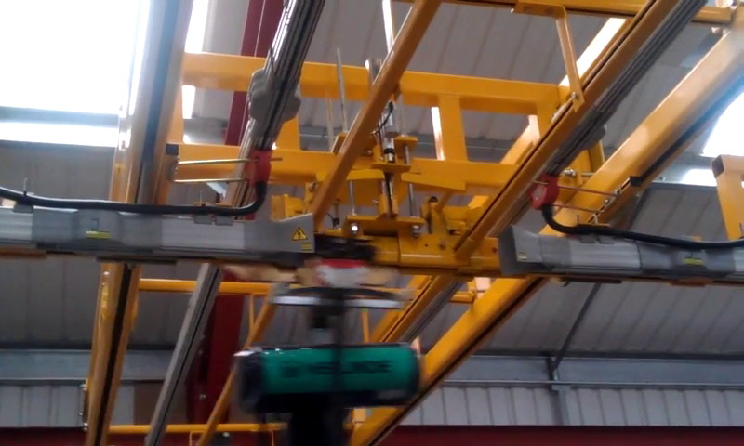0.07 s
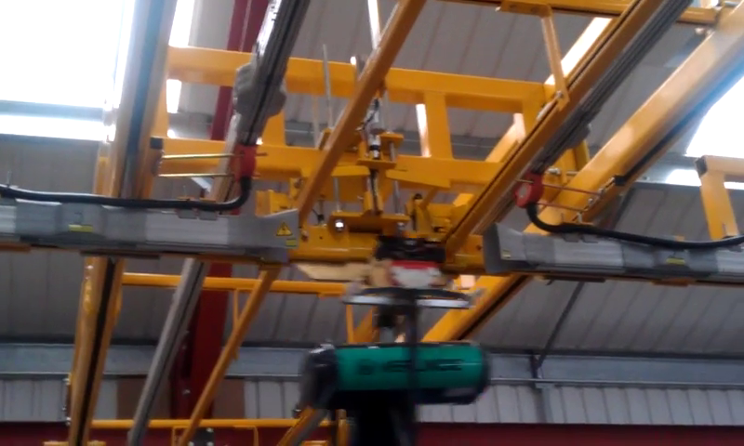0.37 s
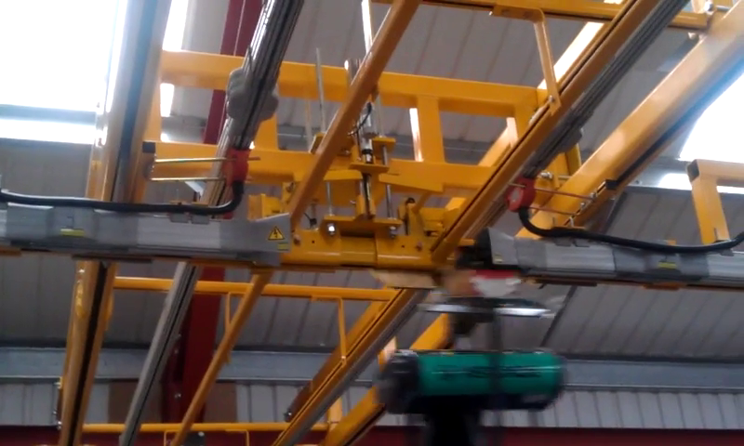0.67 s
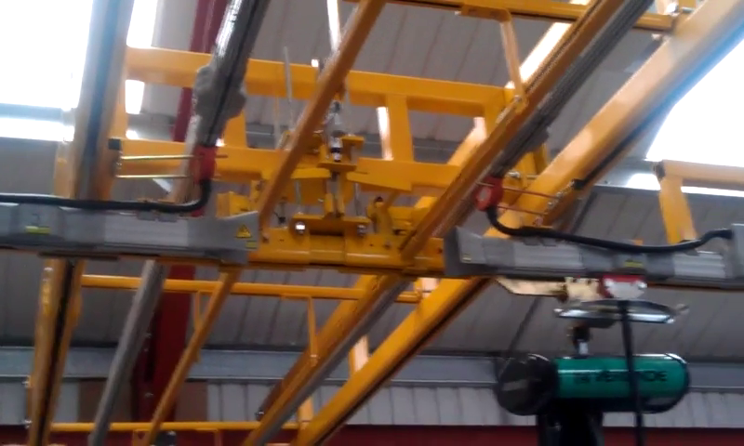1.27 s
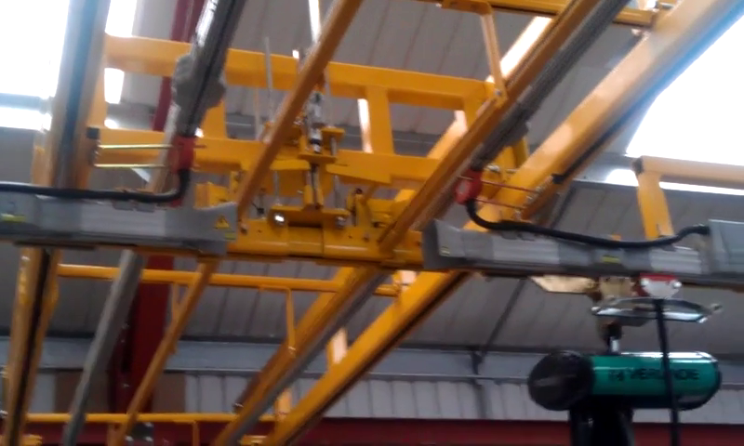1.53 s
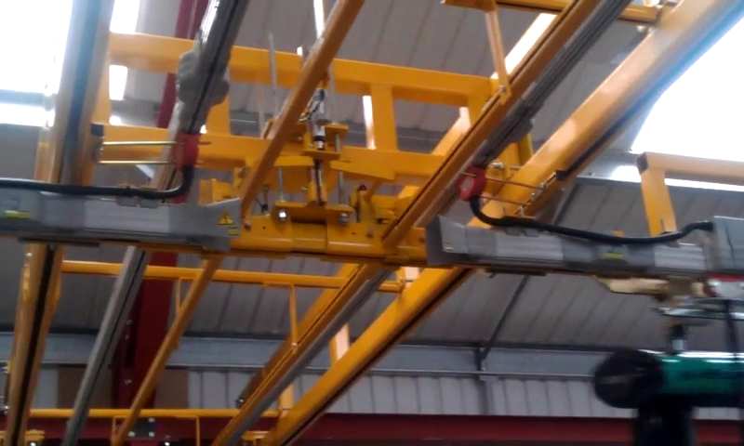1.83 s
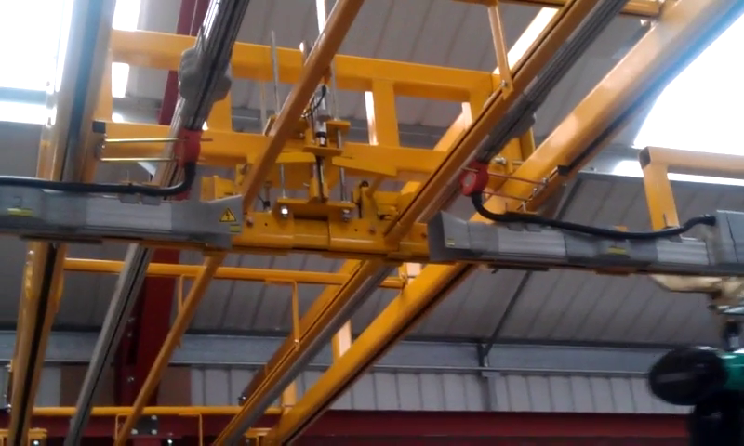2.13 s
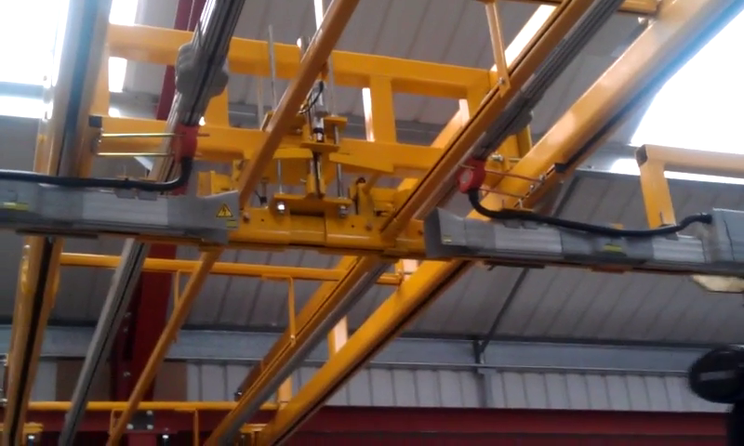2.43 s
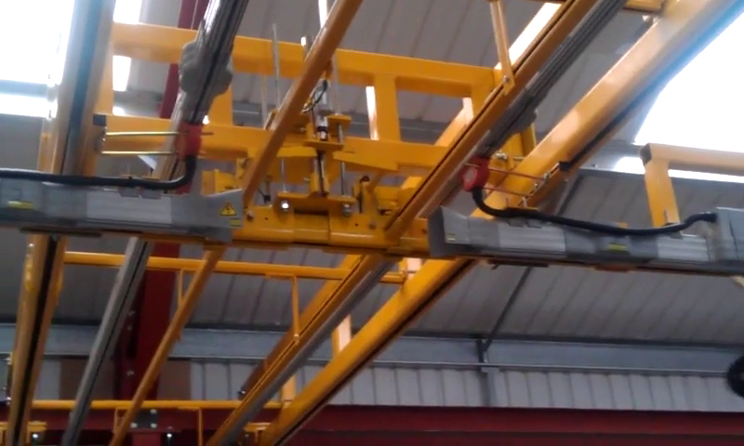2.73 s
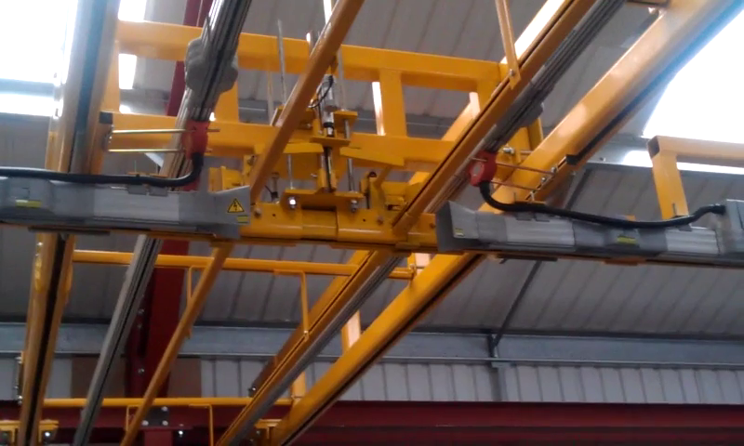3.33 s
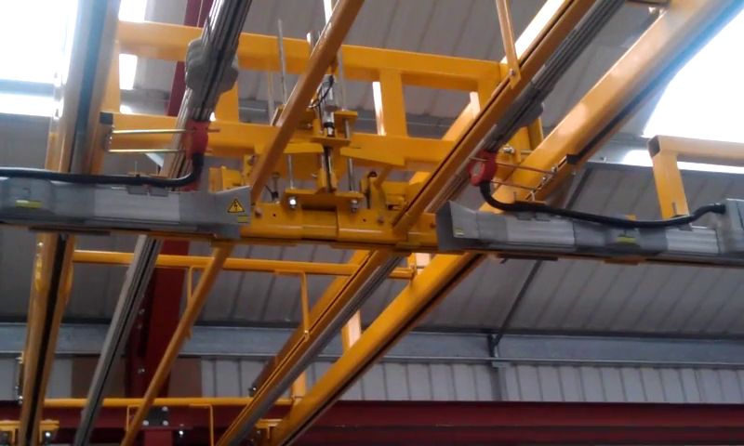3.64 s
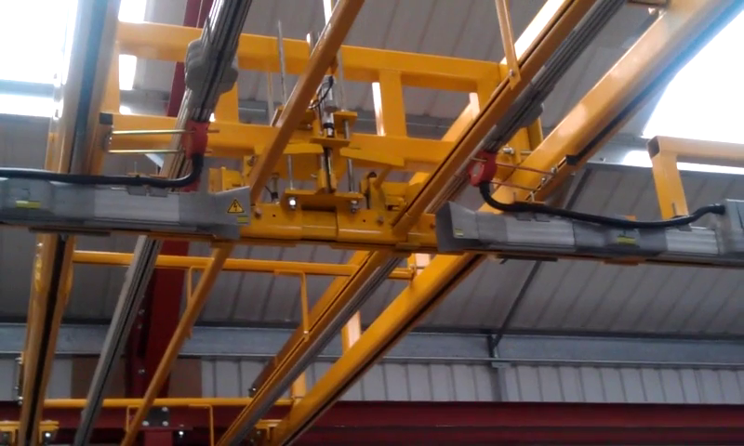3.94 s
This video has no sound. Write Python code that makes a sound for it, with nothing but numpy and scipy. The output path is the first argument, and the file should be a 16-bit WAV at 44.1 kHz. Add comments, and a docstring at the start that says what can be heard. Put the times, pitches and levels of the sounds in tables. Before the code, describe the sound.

Steel wheels roll along an overhead rail with echoing clanks, then recede across an industrial hall.

```python
"""Steel wheels rumble overhead in a factory hall: an electric hoist trolley rolls off along its rail.
The wheels make the rail sing and clank over the joints, the girder thuds under two heavy blows,
and the hall smears every one. A few dry clicks sound close to the pair of microphones.
As the rumble fades, a knock comes from far down the rail and a faint high whine is left."""
import sys
import numpy as np
from scipy import signal
from scipy.fft import rfft, irfft
from scipy.io import wavfile

SR = 44100
rng = np.random.default_rng(int(sys.argv[2]) if len(sys.argv) > 2 else 0)


def log_audio(samples):
    """Write samples as a 16-bit WAV file to the path given in sys.argv[1]."""
    # one column per channel
    frames = np.atleast_2d(samples).T
    # limit to full scale, then quantise
    limited = np.clip(frames, -1, 1)
    pcm = np.round(limited * 32767).astype(np.int16)
    wavfile.write(sys.argv[1], SR, pcm)


N = 176400
T = np.arange(N) / SR
BLOW_SAMPLES = 2 * SR
BLOW_T = T[:BLOW_SAMPLES]

# How alike the two microphones hear the hall. Each row: frequency in Hz, likeness from 0 to 1.
MIC_LIKENESS = [(50, .5), (130, .94), (420, .95), (750, .9), (1200, .33), (2200, .3), (4000, .27),
                (8000, .2)]
# The rail's resonances. Each row: frequency in Hz, width in Hz, lift in dB.
RAIL_RESONANCES = [(288.5, 25, 8), (367, 26, 5.5), (450, 10, 7.5), (529.5, 14, 5.5), (560.8, 6.2, 10.5),
                   (682, 9.3, 5.5), (690, 55, 1), (760, 6.2, 12), (853, 3.7, 9)]


def amp(db):
    """Decibels to gain."""
    return 10 ** (np.asarray(db) / 20)


def unit(x):
    """Scales to rms 1."""
    return x / np.sqrt(np.mean(x ** 2) + 1e-20)


def read(points, hz):
    """Reads a curve on a log-frequency axis."""
    f, value = np.transpose(points)
    return np.interp(np.log(hz + 1), np.log(f), value)


def level(points):
    """Gain over time from a dB curve."""
    return amp(np.interp(T, *np.transpose(points)))


def peak(hz, centre_hz, width_hz):
    """Gain of one resonance; the width is taken at half its height."""
    return 1 / (1 + (2 * (hz - centre_hz) / width_hz) ** 2)


def lift(resonances, hz):
    """Lift in dB from a table of resonances."""
    return sum(db * peak(hz, centre, width) for centre, width, db in resonances)


def tilt(hz, db_per_octave):
    """Brightens or dulls around 2 kHz, in dB."""
    return db_per_octave * np.log2(np.maximum(hz, 300) / 2000)


def add(mix, start_s, sound):
    """Mixes a sound in at its start time."""
    part = mix[:, max(round(start_s * SR), 0):][:, :sound.shape[1]]
    part += sound[:, :part.shape[1]]


def noise(colour_db, size=N):
    """Diffuse noise of rms 1 at the two microphones; colour_db maps Hz to dB."""
    # Each row: frequency in Hz, left microphone minus right in dB.
    balance = [(100, -2), (400, -0.5), (1100, -1.3), (2000, -1.1), (4200, -1.5), (6000, -3), (8000, 2.5),
               (12000, 3)]
    hz = np.fft.rfftfreq(size, 1 / SR)
    mid, side = rfft(rng.standard_normal((2, size)))
    likeness = read(MIC_LIKENESS, hz)
    side *= np.sqrt((1 - likeness) / (1 + likeness))
    lean = amp(read(balance, hz) / 2)
    pair = np.array([(mid + side) * lean, (mid - side) / lean])
    return unit(irfft(pair * amp(colour_db(hz)), size))


def flutter(depth_db, rate_hz, size=N):
    """A gain that wavers at random by depth_db rms, up to about the given rate."""
    hz = np.fft.rfftfreq(size, 1 / SR)
    drift = irfft(rfft(rng.standard_normal(size)) / (1 + (hz / rate_hz) ** 4), size)
    return amp(depth_db * unit(drift))


def dying(colour_db, decay):
    """Noise whose bands each die at their own speed."""
    hz, t, bands = signal.stft(noise(colour_db, BLOW_SAMPLES), SR, nperseg=512)
    bands *= amp(-60 * t / read(decay, hz)[:, None])
    return signal.istft(bands, SR, nperseg=512)[1][:, :BLOW_SAMPLES]


def dense_modes(spacing_hz=45, spread_db=2.2):
    """The steel's countless upper modes: an uneven response in dB, shared by grit and clanks."""
    # Each row: frequency in Hz, width in Hz, lift in dB.
    strongest = [(2020, 40, 3), (3601, 50, 2.5), (3935, 50, 2.5), (4300, 50, 3), (6815, 45, 4),
                 (7124, 40, 5), (7503, 35, 4), (8152, 35, 6), (8425, 30, 11)]
    mode_hz = np.arange(0, SR / 2, spacing_hz)
    heights_db = spread_db * np.clip(rng.standard_normal(len(mode_hz)), -2, 2) * (mode_hz > 1000)
    return lambda hz: np.interp(hz, mode_hz, heights_db) + lift(strongest, hz)


def rolling(steel):
    """Wheels overhead drive the rail's resonances; grit and sliding contact add uneven treble."""
    # All three fade as the trolley moves off. Each row: time in seconds, level in dB.
    rumble_levels = [(0, -29), (.2, -34), (.45, -30), (.8, -32), (1.0, -28), (1.2, -36), (1.36, -34),
                     (1.6, -39.5), (1.79, -43.5), (1.9, -39.5), (2.23, -39), (2.33, -44.5), (2.6, -47.5),
                     (2.82, -50.5), (3.05, -57.5), (3.3, -60.5), (3.6, -67), (4, -73)]
    grit_levels = [(0, -33.5), (.22, -38.5), (.5, -33), (.8, -31.5), (1.0, -32.5), (1.22, -39.5),
                   (1.45, -37.5), (1.62, -48.5), (1.8, -53), (1.86, -44), (2.22, -48), (2.34, -57),
                   (2.58, -57.5), (2.9, -64.5), (3.06, -65.5), (3.45, -71), (3.62, -70.5), (4, -75.5)]
    slide_levels = [(0, -38.5), (.2, -94), (.8, -58), (1.7, -61), (2.05, -75), (2.35, -63.5), (2.87, -62),
                    (3.05, -70.5), (3.65, -79.5), (4, -91)]
    # Their spectra. Each row: frequency in Hz, relative level in dB.
    rumble_tone = [(30, -55.5), (90, -43), (140, -28), (200, -10.5), (300, -7.5), (450, -1), (720, -2),
                   (900, -1.5), (1100, -11), (2000, -18), (5000, -33), (14000, -84.5)]
    grit_tone = [(30, -70), (120, -43.5), (600, -8.5), (1000, 2.5), (1400, -1), (2000, -4.5), (2700, -5.5),
                 (4100, -5.5), (5200, -12.5), (7200, -9), (8400, -16.5), (9300, -24.5), (10500, -40.5),
                 (14000, -63)]
    slide_tone = [(50, -61.5), (3000, -9), (5400, -6), (7000, -1), (8400, -10), (9300, -12.5),
                  (11000, -39.5), (14000, -57)]
    rumble = noise(lambda hz: read(rumble_tone, hz) + lift(RAIL_RESONANCES, hz)) * level(rumble_levels)
    rumble *= flutter(depth_db=.3, rate_hz=35)
    grit = noise(lambda hz: read(grit_tone, hz) + .6 * steel(hz)) * level(grit_levels)
    slide = noise(lambda hz: read(slide_tone, hz)) * level(slide_levels)
    return rumble + (grit + slide) * flutter(depth_db=.9, rate_hz=120)


def rail_singing():
    """Each stretch of rail swells on its own note as the wheels cross it."""
    # Each row: midpoint and length in seconds, pitch and width in Hz, top level in dB.
    stretches = [(0.204, 0.98, 452, 45, -35.5), (1.047, 0.42, 290, 65, -42.5),
                 (1.1, 0.67, 866, 45.1, -38.5), (1.967, 0.44, 681, 180, -39.5),
                 (2.19, 0.2, 784, 280, -42.5), (2.205, .14, 3260, 350, -56), (2.508, 0.5, 881, 70, -50),
                 (2.578, 0.42, 696, 250, -49), (3.001, 1.4, 194.8, 75, -72), (3.591, 1.3, 350, 290, -71.5)]
    out = np.zeros((2, N))
    for middle_s, length_s, pitch, width, db in stretches:
        swell = np.cos(np.pi * np.clip((T - middle_s) / length_s, -.5, .5))
        out += amp(db) * swell * noise(lambda hz: 40 * np.log10(peak(hz, pitch, width)))
    return out


def room_tone(db=-81.5):
    """The quiet air of the hall, all around the microphones."""
    # Each row: frequency in Hz, relative level in dB.
    air_tone = [(25, -5.5), (70, -16.5), (200, -3), (600, -12), (1500, -26), (4000, -27.5), (8000, -22),
                (11000, -17), (14000, -38.5)]
    return amp(db) * noise(lambda hz: read(air_tone, hz))


def ring(modes):
    """Dying steel modes; the high ones reach the two microphones out of step."""
    out = np.zeros((2, BLOW_SAMPLES))
    for hz, db, t60 in modes:
        draws = rng.uniform(0, 2 * np.pi, (3, 1))
        mic_phases = draws[0] + (1 - read(MIC_LIKENESS, hz)) * draws[1:]
        out += amp(db - 60 * BLOW_T / t60) * np.sin(2 * np.pi * hz * BLOW_T + mic_phases)
    return out


def hall_tail(colour_db, rise_s=.0061):
    """The hall's answer to one blow: it builds up, then dies away."""
    # Each row: frequency in Hz, seconds to fall 60 dB.
    hall_decay = [(150, 0.43), (600, 1.3), (2000, 1.0), (5000, 0.97), (8500, 0.58), (11000, 0.37)]
    return dying(colour_db, hall_decay) * (1 - np.exp(-BLOW_T / rise_s))


def clank(db, tilt_db, rise_s, ring_db, crack_db, steel, crack_t60_s=.06, hall_db=-7):
    """A wheel strikes a joint overhead: a crack, a crash of dense modes, longer tones and the hall."""
    # The blow's spectrum. Each row: frequency in Hz, relative level in dB.
    clank_tone = [(30, -55), (100, -46), (170, -18.5), (300, -6.5), (450, 0.5), (750, 1.5), (1100, 0),
                  (1400, -0.5), (1750, -3), (2050, -4), (2750, -6.5), (3600, -6), (4200, -5), (5600, -9.5),
                  (7300, -6.5), (8500, -13), (9600, -20.5), (11500, -36), (14000, -60.5)]
    # Each row: frequency in Hz, seconds to fall 60 dB.
    crash_decay = [(500, .4), (4000, 0.38), (8500, 0.42), (10500, 0.27)]
    # Each row: frequency in Hz, relative level in dB, seconds to fall 60 dB.
    steel_modes = [(413, -22, .49), (726, -17, .56), (1178, -19, .5), (1313, -14, .55), (1464, -18, .5),
                   (1739, -20, .45), (2020, -14.5, .25), (2075, -19, .5), (3935, -25, .6), (4300, -23, .55),
                   (7124, -22, .48), (8425, -19, .55)]
    colour = lambda hz: read(clank_tone, hz) + lift(RAIL_RESONANCES, hz) + steel(hz) + tilt(hz, tilt_db)
    crash = dying(colour, crash_decay)
    crash *= flutter(depth_db=1.6, rate_hz=150, size=BLOW_SAMPLES)  # the wheel chatters as it settles
    crack = noise(lambda hz: 20 * np.log10(peak(hz, 3480, width_hz=2200)) + colour(hz), BLOW_SAMPLES)
    crack *= amp(crack_db - 60 * BLOW_T / crack_t60_s)
    tail = amp(ring_db) * ring(steel_modes) + amp(hall_db) * hall_tail(colour)
    return amp(db) * np.minimum(BLOW_T / rise_s, 1) * (crack + crash + tail)


def girder_thud(db, corner_hz=50, t60_s=.1):
    """The girder gives a brief, deep thud under a heavy blow."""
    bass = noise(lambda hz: 20 * np.log10(peak(hz, 0, 2 * corner_hz)), BLOW_SAMPLES)
    return bass * amp(db - 60 * BLOW_T / t60_s)


def close_click(db, hold_s, tilt_db, ping_db, rise_s=.00074, fall_s=.0015, hall_db=-15):
    """A dry snap with a bright ping close to the microphones, and a weak answer from the hall."""
    # Each row: frequency in Hz, relative level in dB.
    snap_tone = [(30, -19), (150, -23), (700, -1), (1500, 1), (2600, -5), (3900, 4), (5300, -4),
                 (6900, 4.5), (8500, -3), (10500, -15), (12000, -34), (14000, -34)]
    colour = lambda hz: read(snap_tone, hz) + tilt(hz, tilt_db)
    ping = noise(lambda hz: 20 * np.log10(peak(hz, 4150, width_hz=700)), BLOW_SAMPLES)
    snap = noise(colour, BLOW_SAMPLES)
    burst = np.minimum(BLOW_T / rise_s, 1) * np.exp(-np.maximum(BLOW_T - hold_s, 0) / fall_s)
    return amp(db) * ((snap + amp(ping_db) * ping) * burst + amp(hall_db) * hall_tail(colour))


def far_knock(db, rise_s, t60_s=.6, hall_db=-7.5):
    """A hollower blow on steel, heard from far down the rail."""
    # Each row: frequency in Hz, relative level in dB.
    knock_tone = [(40, -30), (110, -36), (180, 3.5), (350, -3.5), (550, 4.5), (850, 3), (1100, -5.5),
                  (1500, -4), (2300, -7), (3200, -9.5), (4100, -4.5), (5400, -10.5), (6800, -3.5),
                  (8400, -14), (9500, -26), (14000, -52)]
    # Each row: frequency in Hz, width in Hz, lift in dB.
    resonances = [(2610, 80, 5), (3560, 80, 6), (4020, 120, 3), (4280, 160, 3)]
    # Each row: frequency in Hz, relative level in dB, seconds to fall 60 dB.
    steel_modes = [(2590, -22, .9), (2615, -21, .9), (3560, -18, .7), (4420, -20, .6), (6600, -14, .45)]
    colour = lambda hz: read(knock_tone, hz) + lift(resonances, hz)
    crash = noise(colour, BLOW_SAMPLES) * amp(-60 * BLOW_T / t60_s)
    tail = ring(steel_modes) + amp(hall_db) * hall_tail(colour)
    return amp(db) * np.minimum(BLOW_T / rise_s, 1) * (crash + tail)


def far_whine():
    """A thin, unsteady whine far off in the hall, coming up at the end."""
    # Each row: frequency in Hz, width in Hz, relative level in dB.
    partials = [(2230, 120, -10.5), (2480, 70, -6)]
    # Each row: time in seconds, level in dB.
    whine_levels = [(3.05, -94), (3.42, -81), (3.5, -74), (3.68, -77), (3.87, -79), (3.98, -73.5)]
    colour = lambda hz: 20 * np.log10(sum(amp(db) * peak(hz, f, width) for f, width, db in partials))
    return noise(colour) * level(whine_levels) * flutter(depth_db=1, rate_hz=30)


def scene():
    """The trolley's run heard from below the rail, with clicks nearby and a knock far off."""
    # Wheels on the joints. Each row: start in seconds, level in dB, tilt in dB per octave,
    # rise in seconds, ring and crack in relative dB.
    clanks = [(.098, -33, -2.5, 0.0053, -4, -3), (0.2405, -17.5, 0.5, 0.0047, 3.5, -12.5),
              (.265, -17, -1, 0.0042, 1.5, -1), (.378, -38, 0, .002, -5, 9.5),
              (.447, -31.5, 0, .003, -0.5, 1), (0.543, -22, 0.5, 0.0014, -2.5, 3.5),
              (.564, -19.5, 0.5, 0.0047, 1, -5.5), (.587, -24.5, -1.5, 0.0044, 2, -11),
              (.672, -35, -1, 0.0023, -5.5, 6.5), (0.736, -38, -1.5, 0.0065, -0.5, -9),
              (.82, -41.5, 6.5, 0.0018, -11, 9), (.887, -24, 1.5, 0.0013, -1, 3),
              (0.916, -23, 3, 0.01, -9, -18), (.965, -28.5, -1.5, 0.0087, -9.5, -11),
              (1.431, -35, 0.5, 0.0045, -11, -12), (1.817, -40, -4, 0.0094, -8, -10),
              (2.156, -44.5, -0.5, 0.01, -11, -4)]
    # Each row: start in seconds, level in dB.
    thuds = [(.243, -55), (.545, -60)]
    # Each row: start in seconds, level in dB, hold in seconds, tilt in dB per octave, ping in relative dB.
    clicks = [(1.2755, -31.5, .005, -1.5, -12), (1.3165, -29.5, .004, .7, -14),
              (1.3848, -26.8, .008, .5, -12), (1.4300, -23.2, .003, -.4, 0), (1.995, -46, .005, 4, -20),
              (2.035, -47, .004, 4, -20), (3.703, -69, .006, 1, -10)]
    # Each row: start in seconds, level in dB, rise in seconds.
    knocks = [(3.079, -45.5, 0.0036), (3.113, -53, 0.0068)]
    steel = dense_modes()
    mix = rolling(steel) + rail_singing() + room_tone() + far_whine()
    for start_s, *blow in clanks:
        add(mix, start_s, clank(*blow, steel))
    for start_s, db in thuds:
        add(mix, start_s, girder_thud(db))
    for start_s, *snap in clicks:
        add(mix, start_s, close_click(*snap))
    for start_s, db, rise_s in knocks:
        add(mix, start_s, far_knock(db, rise_s))
    return mix


def record(dry):
    """The recorder cuts the treble above 13.9 kHz."""
    lowpass = signal.firwin(511, 13900, window=("kaiser", 9), fs=SR)
    return signal.oaconvolve(dry, lowpass[None], "same")


dry = scene()
out = record(dry)
log_audio(out)
```